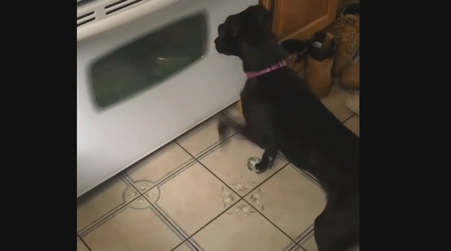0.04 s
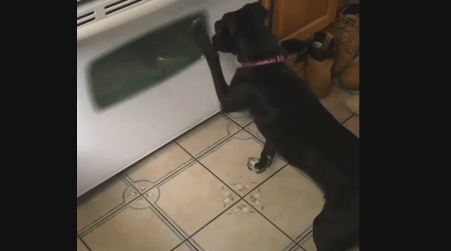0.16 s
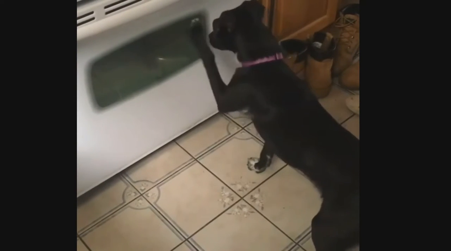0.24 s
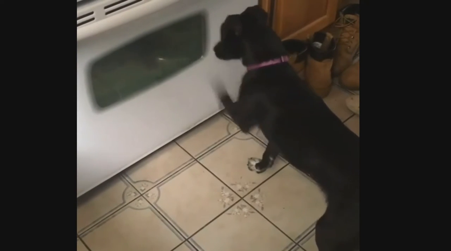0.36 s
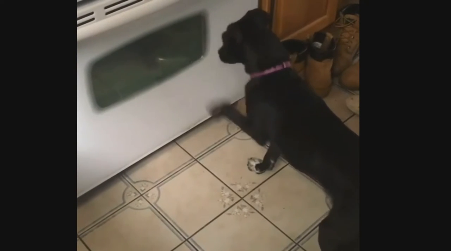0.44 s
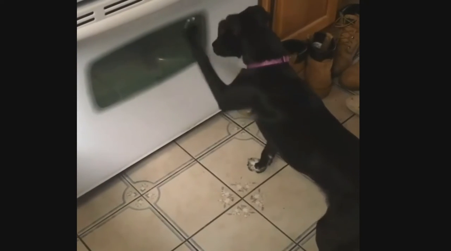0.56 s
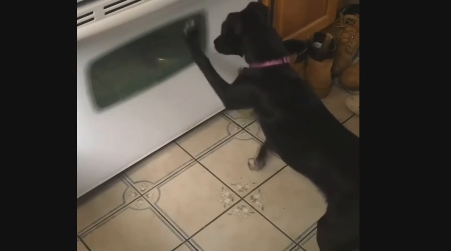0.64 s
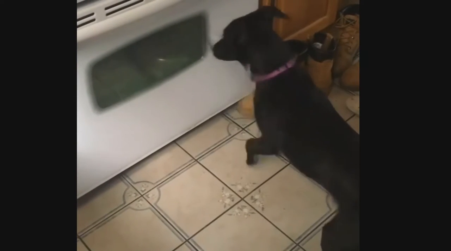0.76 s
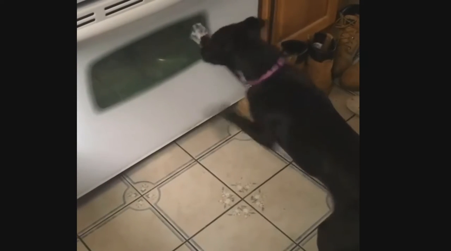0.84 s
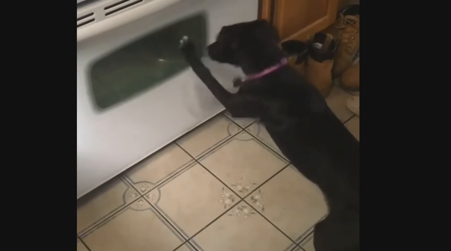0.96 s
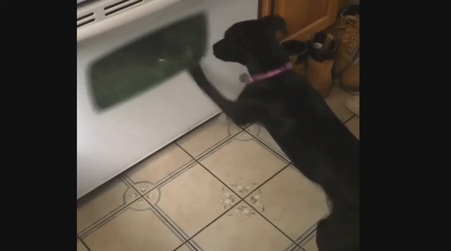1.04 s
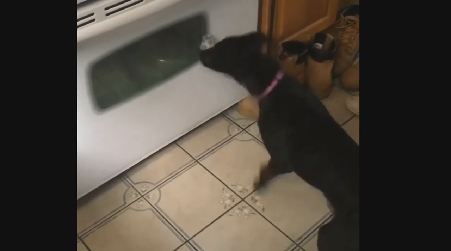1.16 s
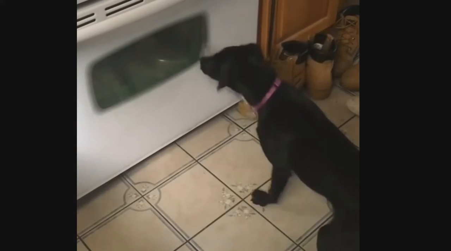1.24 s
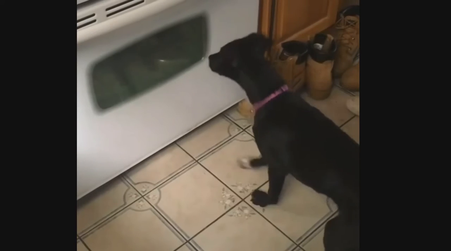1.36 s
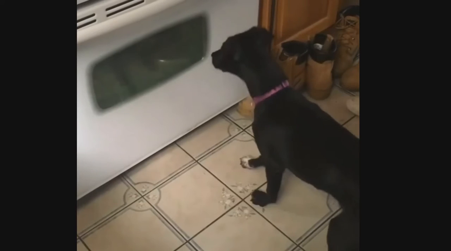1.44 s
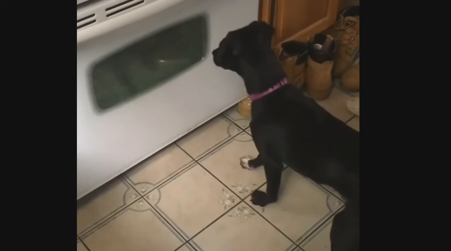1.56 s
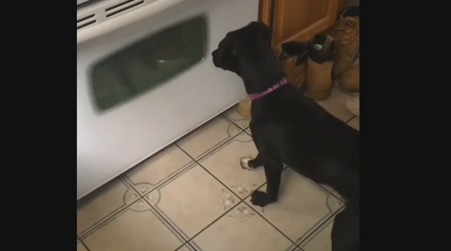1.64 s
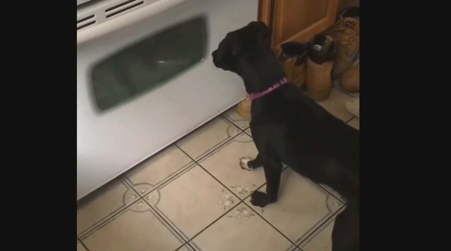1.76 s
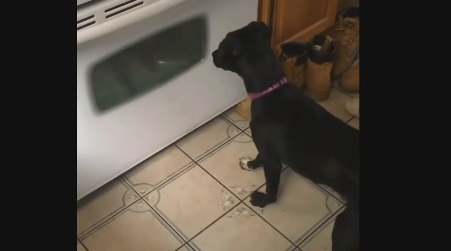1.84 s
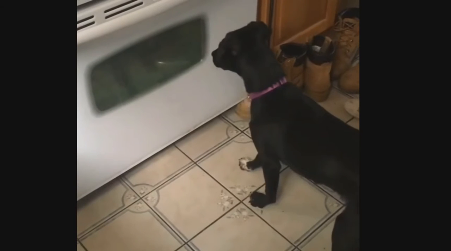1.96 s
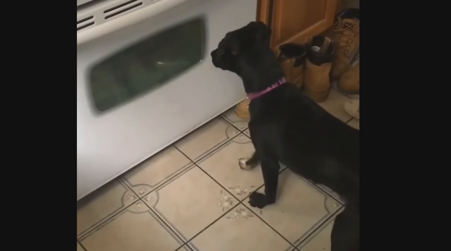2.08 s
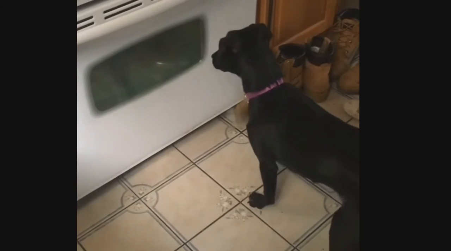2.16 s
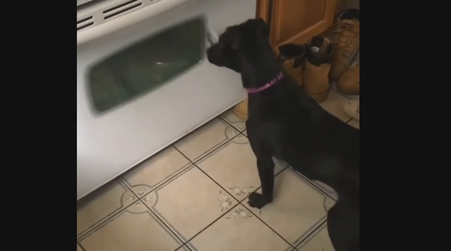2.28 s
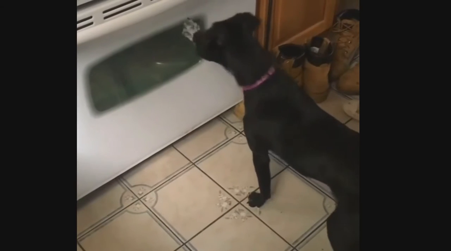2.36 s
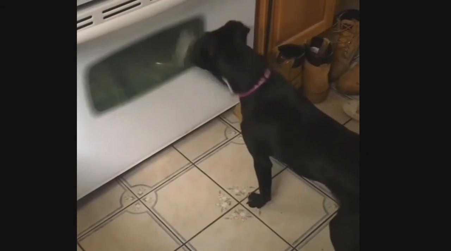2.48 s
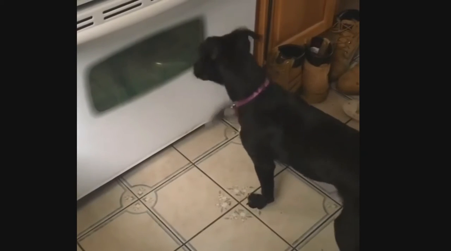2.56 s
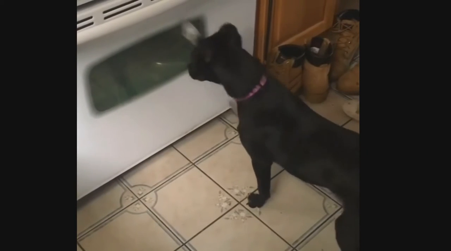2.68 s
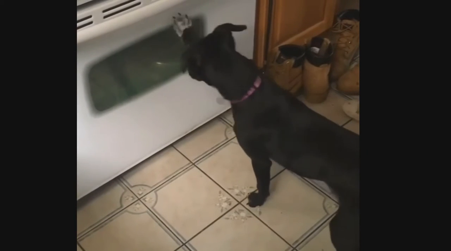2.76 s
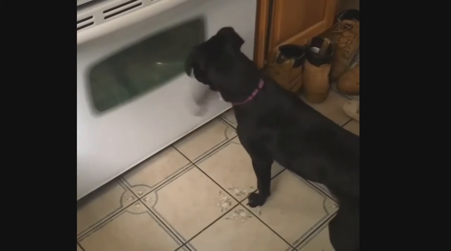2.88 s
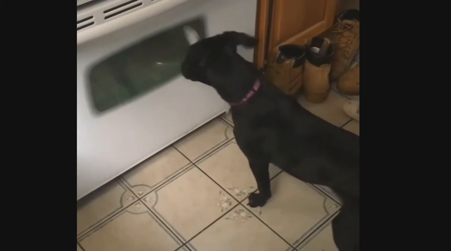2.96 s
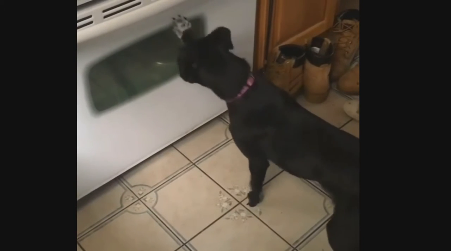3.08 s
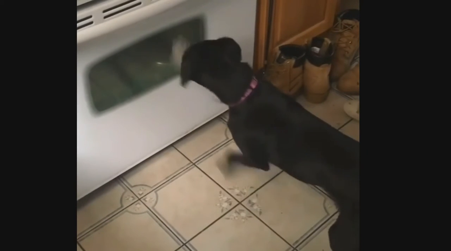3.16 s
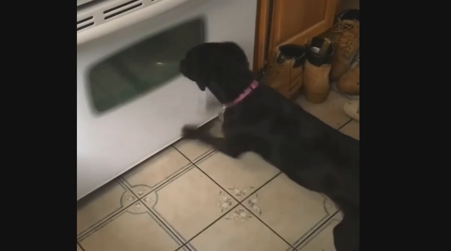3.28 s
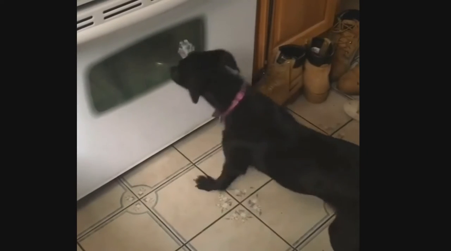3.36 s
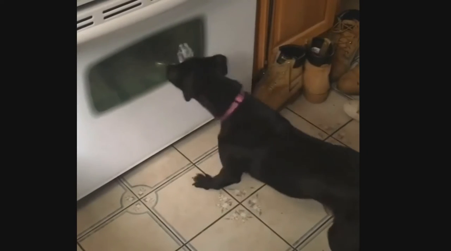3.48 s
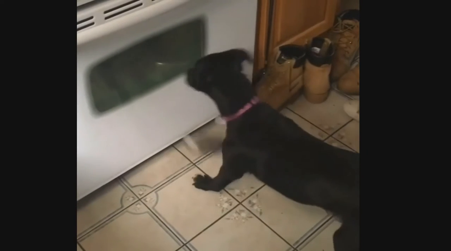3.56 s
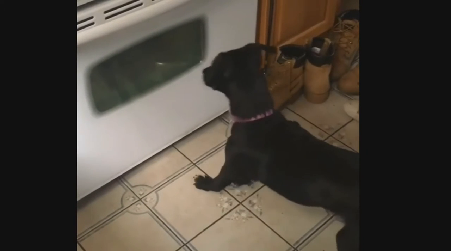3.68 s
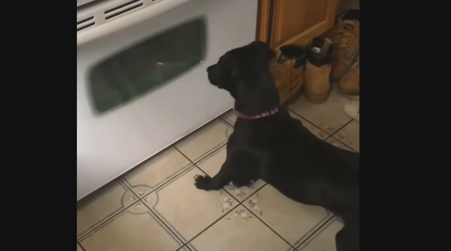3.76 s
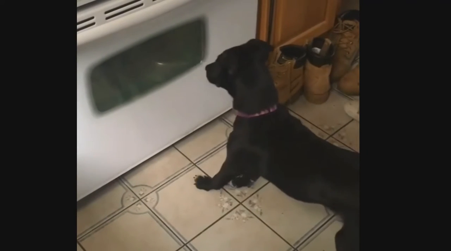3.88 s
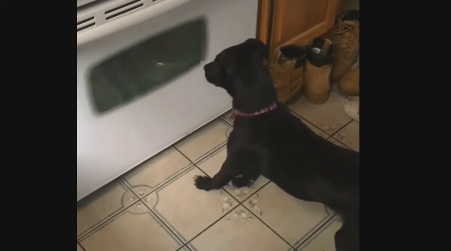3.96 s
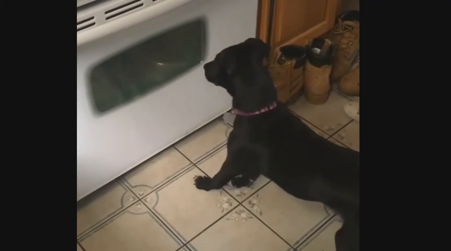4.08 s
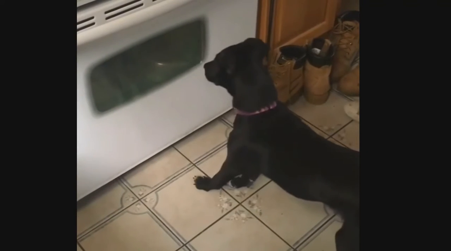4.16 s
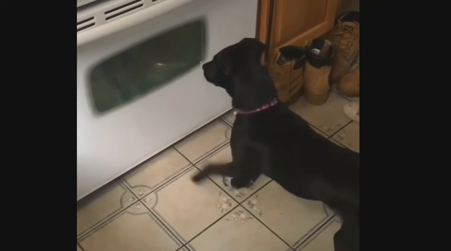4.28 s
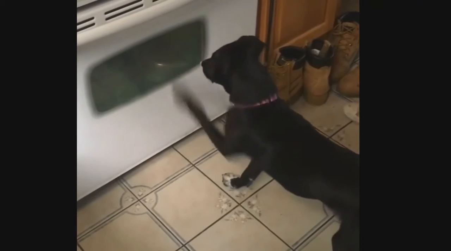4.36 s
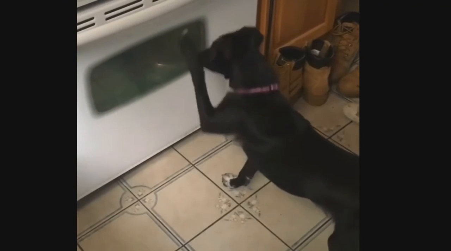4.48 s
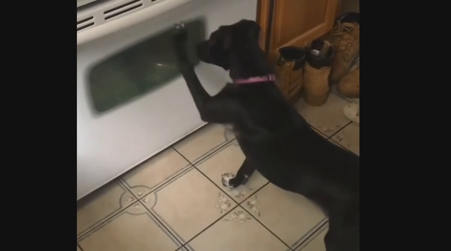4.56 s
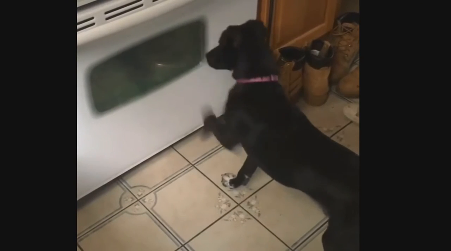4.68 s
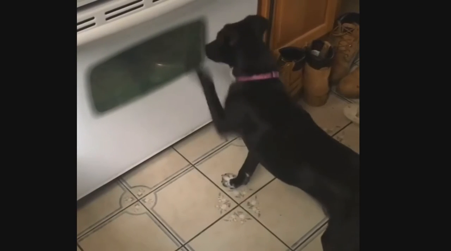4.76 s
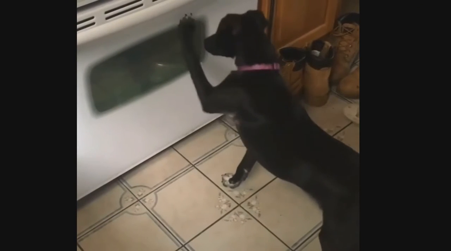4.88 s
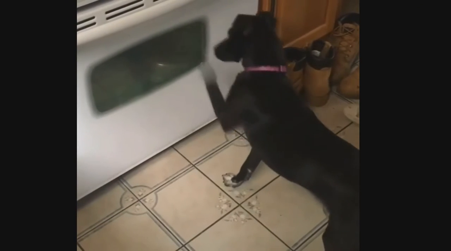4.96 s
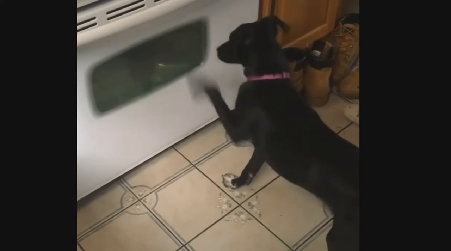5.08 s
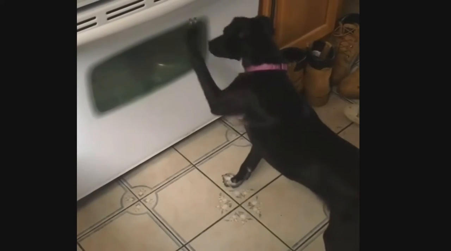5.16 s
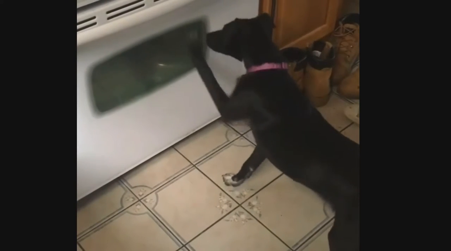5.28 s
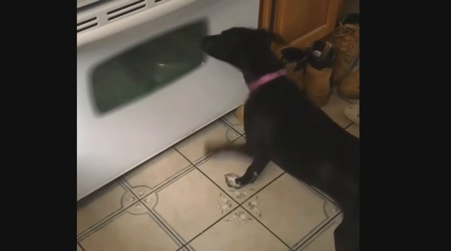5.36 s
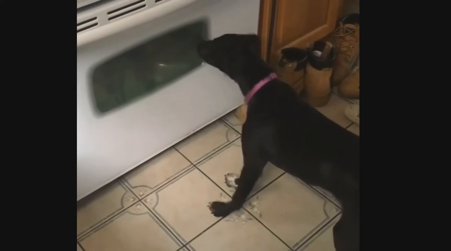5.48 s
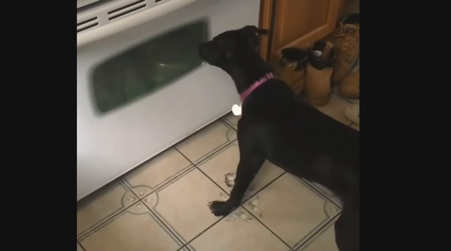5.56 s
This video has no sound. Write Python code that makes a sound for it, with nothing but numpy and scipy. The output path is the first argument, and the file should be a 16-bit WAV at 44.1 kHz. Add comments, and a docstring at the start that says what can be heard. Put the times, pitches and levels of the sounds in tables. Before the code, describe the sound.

A small kitchen heard close up, with a low steady appliance hum and faint hiss. In the first 0.15 seconds a puppy gives one tiny, low, closed-mouth whine, as a light claw swipe begins. Stronger swipes follow at about 0.5, 0.8, 0.9 and 1.1 seconds: crisp paired claw scratches ringing briefly in glass and trim, then padded thuds, rubbing drags and a faint low pad groan near 0.4. Thin, very high collar tags clink throughout, loudest around 1.0. Paws drop with a hollow floor knock at 1.3, tags settle, and it quietens. A second group runs from 2.3 to 3.3, with heavier door thumps near 3.0 and 3.3 and bright tag rattles, then a clawed landing on tile at 3.6. After a near-quiet pause, three more swipes come at 4.5, 4.8 and 5.1, small edge catches ticking between, ending with a clink and soft footfall near 5.4.

```python
"""A puppy paws at a glass oven door in a small kitchen, after one short low whine.
Its claws skid in bursts of tiny slips that excite the door's modes; its pads rub in jerks and groan.
Damped tones make the thuds on door and tiles, and decaying high modes the clinking collar tags.
An appliance hums under it all, and decaying echoes give the room."""
import sys
import numpy as np
from scipy import signal
from scipy.fft import rfft, irfft
from scipy.io import wavfile
from scipy.ndimage import uniform_filter1d

SR = 44100
rng = np.random.default_rng(int(sys.argv[2]) if len(sys.argv) > 2 else 0)


def bounce(signal):
    """Save signal as a 16-bit WAV file at the path given by the first command-line argument."""
    frames = np.transpose(np.atleast_2d(signal))
    limited = np.clip(frames, -1, 1)
    pcm = np.round(limited * 32767).astype(np.int16)
    wavfile.write(sys.argv[1], SR, pcm)


N = 247842

# Levels in all tables are relative. Spectra list relative density (frequency [Hz], density [dB per Hz]).
# mains hum harmonics: (frequency [Hz], level [dB])
HUM_HARMONICS = [(120, -44), (240, -73), (360, -88)]
# spectrum of low rumble and faint hiss: (frequency [Hz], density [dB per Hz])
AIR_SPECTRUM = [(20, -13), (38, 2), (52, 10), (75, -9), (150, 1), (220, -13.5), (400, -23), (700, -30),
                (1200, -30), (2500, -35.5), (5000, -40), (12000, -35)]
# the whine's course: (time [s], pitch [Hz], level [dB])
WHINE_COURSE = [(.015, 274.6, -85), (.045, 278, -44), (0.079, 302, -52), (.11, 312, -75), (.135, 295, -59)]
# spectrum of a skidding claw: (frequency [Hz], density [dB per Hz])
CLAW_SPECTRUM = [(150, -9), (500, -23), (1000, -14), (2000, -11), (3200, -6), (4500, -5), (5500, -3),
                 (7500, -6.5), (10500, -9), (13500, -9.5)]
# modes of the door's glass and trim: (frequency [Hz], level [dB], t60 [s])
DOOR_MODES = [(1000, -9, .2), (1340, -9, .2), (2250, -7, .2), (2569, -4, .25), (2840, -3, .25),
              (3169, 0, .25), (3276, -2, .25), (3548, -2, .25), (3818, 2, .25), (4573, 0, .25),
              (5310, 1, .22), (6195, -2, .22), (6328, -1, .22), (6877, -1, .22), (7539, -2, .2),
              (8532, -1, .2)]
# swipes, each two claw strikes, a pad thud and a drag down the door:
# (time [s], claw level [dB], gap to second claw [s], second skid [s], extra knock [dB], extra fizz [dB],
#  claw pitch [Hz], pad thud level [dB], drag length [s], drag level [dB])
PAW_SWIPES = [(0.1432, -23, .0165, 0.0044, -3, 2, 6300, -65, 0.18, -57),
              (0.5161, -14.5, 0.0052, 0.0061, -4.5, 3, 5420, -38, 0.16, -47),
              (0.7829, -14.5, 0.0036, 0.01, -3, 3, 6750, -44.5, 0.097, -51.5),
              (0.9035, -17, .006, .01, -4, 8, 6240, -56, .12, -48),
              (1.104, -15.5, .005, 0.013, .5, 2.5, 6700, -39, 0.13, -53.5),
              (2.3146, -24, .0045, 0.0144, -5.5, -0.5, 6260, -63, 0.15, -53.5),
              (2.6565, -20, 0.0074, 0.0042, -6.5, 1.5, 5800, -35, 0.16, -52),
              (2.969, -15.5, 0.0058, .004, -3.5, 0.5, 5600, -31.5, 0.17, -55),
              (3.314, -15.5, .007, 0.0056, 1, 2.5, 4950, -29, 0.16, -56),
              (4.483, -18.5, 0.005, 0.02, 0, 4.5, 6170, -59, .12, -47.5),
              (4.794, -14.5, 0.0062, 0.0034, -8.5, 2.5, 5300, -35.5, 0.17, -48.5),
              (5.1129, -15, 0.0048, 0.0056, -4, 3, 6100, -32, 0.19, -48.5)]
# on the way down a claw catches the door's edge:
# (time [s], skid [s], level [dB], extra knock [dB], extra fizz [dB], claw pitch [Hz])
EDGE_CATCHES = [(0.329, 0.015, -40, -0.5, -15, 3300), (0.689, 0.009, -35, 10, -5.5, 3860),
                (3.177, .006, -36, -2, 8, 7500), (4.955, 0.0088, -38.5, 11, -7, 4000),
                (4.992, 0.0064, -37, 9, 13, 2800), (5.285, 0.0089, -34, 11, -4, 3850)]
# paws come down on the tiles and slide a little:
# (time [s], claw level [dB], extra fizz [dB], weight level [dB], thud pitch [Hz], slide level [dB])
LANDINGS = [(1.305, -51, -6, -13, 161, -90), (2.185, -65.5, -9, -61, 230, -82.5),
            (3.61, -33, 7.5, -20.5, 223, -64.5), (4.135, -54, 21.5, -56.5, 229, -89.5),
            (5.433, -45, 1, -36.5, 226, -81.5)]
# spectrum of the hollow door when bumped: (frequency [Hz], density [dB per Hz])
HOLLOW_SPECTRUM = [(250, -8.5), (450, -3), (700, -0.5), (930, 0.5), (1400, 1.5), (2200, -8.5), (3500, -4),
                   (7000, -21)]
# spectrum of a pad's slap: (frequency [Hz], density [dB per Hz])
SLAP_SPECTRUM = [(60, -25), (150, 7), (240, 1.5), (320, -4.5), (410, -6), (510, -18), (700, -11),
                 (950, -24), (1400, -24), (1800, -22), (2250, -20.5), (5000, -58)]
# spectrum of rubbing pads: (frequency [Hz], density [dB per Hz])
RUB_SPECTRUM = [(200, -8.5), (500, -4), (1000, 1.5), (2000, -4), (4000, 1.5), (7000, -3), (13000, -7)]
# spectrum of the grumbling sheet metal: (frequency [Hz], density [dB per Hz])
PANEL_SPECTRUM = [(20, -52.5), (45, 9), (80, 12), (160, -5), (250, 3), (330, -2), (450, -17), (900, -26.5),
                  (3000, -47.5)]
# pads stick and slip on the glass, one list per groan: (time [s], pitch [Hz], level [dB])
GROAN_COURSES = [
    [(.23, 230, -61), (.26, 243, -47), (.3, 272, -68)],
    [(.35, 185, -52), (.395, 161, -40.5), (.425, 142, -46), (.465, 136, -54)],
    [(4.825, 277.9, -54), (4.86, 264.7, -48.5), (4.94, 260, -63)],
]
# hard clinks of the collar tags:
# (time [s], level [dB], extra dry tick [dB], large tag against small [dB])
TAG_CLINKS = [(0.4574, -43, -13, -2), (0.7562, -31.5, -18, -10), (0.8799, -29.5, -4.5, -5),
              (1.0345, -20, -13.5, -24), (1.055, -23, -2, -14), (1.1744, -24, -19.5, -14),
              (1.2875, -33, 3, -15), (1.3488, -41.5, 13.5, -10), (1.4541, -30, 0.5, -9),
              (1.5618, -39, -0.5, -12), (1.6945, -53.5, 6.5, -9), (2.5551, -30, 0.5, -23),
              (2.7836, -38.5, 1.5, -3), (2.9003, -40.5, 5, -15.5), (2.9542, -29, -5.5, -21),
              (3.0914, -21.5, -11.5, -13.5), (3.2575, -17, -2.5, -25), (3.2894, -26, 7.5, -8.5),
              (3.4246, -20.5, 7.5, -12), (3.5324, -26, -3.5, -14.5), (4.0951, -37, 0.5, -33.5),
              (4.7027, -28, -4, -4), (5.0444, -25.5, -17, -3), (5.0883, -20.5, 3.5, -19),
              (5.4131, -27, 0.5, -16)]
# modes of the two tags, damped by fur: (frequency [Hz], level [dB], t60 [s])
SMALL_TAG_MODES = [(7041, -15, .16), (8473, -13, .16), (9800, -12, .08), (11090, -9, .08), (11880, -1, .17),
                   (11950, 0, .17), (12020, -1, .14), (12135, -5, .12), (13200, -8, .07)]
LARGE_TAG_MODES = [(7666, 0, .5), (10470, -5, .2), (11930, -1, .3)]
# modes of the sprung floor: (frequency [Hz], level [dB], t60 [s])
FLOOR_MODES = [(160, -2, .1), (235, -1, .09), (300, 0, .09), (360, -4, .08), (690, -18, .07),
               (1450, -22, .08), (1640, -19, .11), (1780, -16, .1), (1950, -21, .08)]
# decay of the room's echoes: (frequency [Hz], t60 [s])
KITCHEN_DECAY = [(100, 0.63), (400, 0.37), (1500, 0.32), (4000, 0.26), (8000, 0.21), (14000, 0.22)]

AIR_DB = -52
# the leading claw has a fixed skid; the second claw is lighter the longer it skids
FIRST_SKID_S, FIRST_CLAW_DB, SKID_FADE_DB_PER_S = 0.0042, -1, 150.5
STEP_SKID_S, STEP_KNOCK_DB, STEP_HZ = 0.0056, 8, 9600
# the hollow door answers a square, knocking strike most (dB of bump per dB of knock)
BUMP_DB, BUMP_PER_KNOCK = -20.5, 2.6
# the pad follows the claws, with weight behind it; its bump and push are against its thud
PAD_LAG_S, PAD_HZ, PAD_PUSH_DB, PAD_BUMP_DB = .062, 239.5, 1, -7.5
# let go, the door springs back: lags after the slip-off, and levels against the drag
REBOUND_LAG_S, REBOUND_PUSH_LAG_S = .026, .045
REBOUND_BUMP_DB, REBOUND_THUD_DB, REBOUND_PUSH_DB = 10.5, 5.5, 16.5
DRAG_RISE_S, DRAG_RELEASE_S, SLIDE_S, RUB_DB, FLEX_DB = 0.14, .1, 0.18, 3, 4.5
# every swipe also sets the tags swinging into faint clinks
SWING_FROM_S, SWING_TO_S = .1, .36
SWING_DB, SWING_SPREAD_DB, SWING_TICK_DB, SWING_LARGE_DB = -44.5, 5.5, 0, -14.5
# the tags hang differently at every blow, which shifts their pitch by up to this fraction
RATTLE_S, TAG_DETUNE = .0045, 0.0019
# claws touch first, then the floor knocks, the pad thuds and the weight settles
KNOCK_LAG_S, HEEL_LAG_S, SETTLE_LAG_S, HEEL_DB, SETTLE_DB = 0.00323, .016, 0.0343, -6, -12
EDGE_HZ = 14050


def amp(db):
    """Converts decibels to a linear gain."""
    return 10 ** (np.asarray(db) / 20)


def evened(x):
    """Normalizes power: scales to rms 1."""
    return x / np.sqrt(np.mean(x ** 2) + 1e-20)


def read(points, hz):
    """Interpolates linearly along a logarithmic frequency axis."""
    f, value = np.transpose(points)
    return np.interp(np.log(hz + 1), np.log(f + 1), value)


def add(mix, s, sound):
    """Superposes a sound on the mix at time s."""
    part = mix[max(round(s * SR), 0):][:len(sound)]
    part += sound[:len(part)]


def coloured(x, *spectra):
    """Linear filtering in the frequency domain: the dB spectra of cascaded filters sum."""
    hz = np.fft.rfftfreq(len(x), 1 / SR)
    gain_db = sum(read(points, hz) for points in spectra)
    return irfft(rfft(x) * amp(gain_db), len(x))


def background():
    """Periodic mains hum of an appliance plus broadband noise for its low rumble and faint hiss."""
    t = np.arange(N) / SR
    hum = np.zeros(N)
    for hz, db in HUM_HARMONICS:
        hum += amp(db) * np.sqrt(2) * np.sin(2 * np.pi * (hz * t + rng.random()))
    air = evened(coloured(rng.standard_normal(N), AIR_SPECTRUM))
    return hum + amp(AIR_DB) * air


def glide(rows, overtones_db, roughness):
    """Frequency modulation: a wavering harmonic tone follows rows of (time [s], pitch [Hz], level [dB])."""
    s, hz, db = np.transpose(rows)
    t = np.arange(N) / SR
    waver = evened(uniform_filter1d(rng.standard_normal(N), size=200))
    pitch = np.interp(t, s, hz) * (1 + roughness * waver)
    turns = np.cumsum(pitch) / SR
    tone = sum(amp(level) * np.sin(2 * np.pi * (k + 1) * turns) for k, level in enumerate(overtones_db))
    return evened(tone) * amp(np.interp(t, s, db, left=-120, right=-120))


def whine():
    """Voiced harmonics in a soft closed-mouth whine that rises, then dips at its end."""
    return glide(WHINE_COURSE, overtones_db=[3.0, -15.0, -18.5, -28], roughness=.05)


def slips(size, spread_db):
    """Stick-slip friction as noise: dense tiny slips of uneven strength."""
    unevenness = np.minimum(rng.exponential(1, size), 4)
    return evened(rng.standard_normal(size) * amp(spread_db * unevenness))


def contact(length, rise, release, size=4096):
    """Contact force: an exponential bite, a hold while skidding, and an exponential release."""
    t = np.arange(size) / SR
    return (1 - np.exp(-t / rise)) * np.exp(-np.maximum(t - length, 0) / release)


def ring(modes, scatter_db, size=24576, detune=0):
    """Modal decay with energy 1; every blow lands elsewhere and favours other modes."""
    t = np.arange(size) / SR
    hz, db, t60 = np.transpose(modes)[:, :, None]
    db = db + scatter_db * rng.uniform(-1, 1, hz.shape)
    hz = hz * (1 + detune * rng.uniform(-1, 1, hz.shape))
    partials = amp(db - 60 * t / t60) * np.sin(2 * np.pi * (hz * t + rng.random(hz.shape)))
    out = np.sum(partials, axis=0)
    onset = np.minimum(np.arange(size) / 44, 1)  # about 1 ms
    return out * onset / np.linalg.norm(out)


def claw(length, db, knock_db, fizz_db, hz):
    """Dry friction: a claw skids for milliseconds in a burst of slips, peaked at its own pitch."""
    force = contact(length, rise=.0006, release=.0016)
    tint = [(1500, knock_db), (3300, 0.0031), (5000, 0.0026), (9500, fizz_db)]
    squeak = [(hz / 1.25, 0), (hz, 3), (hz * 1.25, 0)]
    grain = coloured(slips(len(force), spread_db=3.5), CLAW_SPECTRUM, tint, squeak)
    return amp(db) * force * evened(grain)


def scratches():
    """Friction exciting resonance: claws set the door ringing briefly, while the tiles stay dead."""
    out, skids = np.zeros(N), []
    for s, db, gap, length, knock_db, fizz_db, hz, *_ in PAW_SWIPES:
        skids.append((s, claw(FIRST_SKID_S, db + FIRST_CLAW_DB, knock_db, fizz_db, hz)))
        second_db = db - SKID_FADE_DB_PER_S * length
        skids.append((s + gap, claw(length, second_db, knock_db, fizz_db, hz)))
    for s, length, db, knock_db, fizz_db, hz in EDGE_CATCHES:
        skids.append((s, claw(length, db, knock_db, fizz_db, hz)))
    for s, skid in skids:
        add(out, s, amp(1.5) * skid)
        door = ring(DOOR_MODES, scatter_db=5.5, size=8192)
        add(out, s, amp(-15.5) * np.linalg.norm(skid) * door)
    for s, db, fizz_db, *_ in LANDINGS:
        add(out, s, amp(7.5) * claw(STEP_SKID_S, db, STEP_KNOCK_DB, fizz_db, STEP_HZ))
    return out


def bump(db, length):
    """Forced response of a cavity: a paw bumps and scuffs the hollow door."""
    force = contact(length, rise=.002, release=0.024)
    scuff = evened(coloured(slips(len(force), spread_db=4.5), HOLLOW_SPECTRUM))
    return amp(db - 10.0) * force * scuff


def thud(db, hz, t60, slap_db):
    """Cushioned impact: a padded blow gives a damped tone with a noisy slap."""
    t = np.arange(SR // 4) / SR
    cushion = 1 - np.exp(-t / .003)
    tone = amp(-60 * t / t60) * np.sin(2 * np.pi * hz * t)
    slap_force = contact(0.0036, rise=0.00081, release=0.024, size=len(t))
    slap = slap_force * evened(coloured(rng.standard_normal(len(t)), SLAP_SPECTRUM))
    return amp(db + 0.5) * cushion * (tone + amp(slap_db) * slap)


def push(db, hz=55):
    """Low-frequency pressure pulse: one slow push of the puppy's weight under a Gaussian swell."""
    t = np.arange(SR // 12) / SR - .025  # the swell peaks 25 ms in
    swell = np.exp(-(t / .011) ** 2)
    return amp(db - 4) * swell * np.cos(2 * np.pi * hz * t)


def paws():
    """Impact and elastic recoil: the door bumps, the pad thuds, and the door springs back at slip-off."""
    out = np.zeros(N)
    for s, db, _, _, knock_db, _, _, pad_db, drag, drag_db in PAW_SWIPES:
        add(out, s, bump(db + BUMP_DB + BUMP_PER_KNOCK * knock_db, length=0.054))
        pad_s = s + PAD_LAG_S
        add(out, pad_s, thud(pad_db, hz=PAD_HZ, t60=0.079, slap_db=-9))
        add(out, pad_s, bump(pad_db + PAD_BUMP_DB, length=.007))
        add(out, pad_s, push(pad_db + PAD_PUSH_DB))
        let_go = s + drag
        add(out, let_go + REBOUND_LAG_S, bump(drag_db + REBOUND_BUMP_DB, length=0.026))
        add(out, let_go + REBOUND_LAG_S, thud(drag_db + REBOUND_THUD_DB, hz=260, t60=0.14, slap_db=2))
        # the weight shifts after the paw lets go
        add(out, let_go + REBOUND_PUSH_LAG_S, push(drag_db + REBOUND_PUSH_DB))
    return out


def rubbing():
    """Jerky sliding friction: pads drag down the door, whose sheet metal grumbles, and slide on tiles."""
    on_door, on_tiles = np.zeros((2, N))
    for s, *_, length, db in PAW_SWIPES:
        add(on_door, s, amp(db) * contact(length, rise=DRAG_RISE_S, release=DRAG_RELEASE_S, size=SR))
    for s, *_, db in LANDINGS:
        add(on_tiles, s, amp(db) * contact(SLIDE_S, rise=0.025, release=0.049, size=SR))
    unevenness = evened(coloured(rng.standard_normal(N), [(40, 62), (100, -67), (300, -91)]))
    jerks = amp(3.3 * unevenness)
    grain = evened(coloured(jerks * slips(N, spread_db=7), RUB_SPECTRUM))
    grumble = evened(jerks * coloured(rng.standard_normal(N), PANEL_SPECTRUM))
    return (on_door + on_tiles) * amp(RUB_DB) * grain + on_door * amp(FLEX_DB) * grumble


def groans():
    """Periodic stick-slip: damp pads judder down the glass with a low groan."""
    return sum(glide(rows, overtones_db=[0, -17, -26], roughness=0.03) for rows in GROAN_COURSES)


def swings(count=2):
    """Pendulum-like swing: faint clinks at random moments after each swipe, in rows like TAG_CLINKS."""
    rows = []
    for s, *_ in PAW_SWIPES:
        for when, force in rng.random((count, 2)):
            clink_s = s + SWING_FROM_S + when * (SWING_TO_S - SWING_FROM_S)
            clink_db = SWING_DB + SWING_SPREAD_DB * (2 * force - 1)
            rows.append((clink_s, clink_db, SWING_TICK_DB, SWING_LARGE_DB))
    return rows


def collar():
    """Repeated impact of two resonators: metal tags strike, ring, and chatter on for a moment."""
    ticks, rings = np.zeros((2, N))
    force = contact(RATTLE_S, rise=0.00031, release=0.0032)
    for s, db, tick_db, large_db in list(TAG_CLINKS) + swings():
        add(ticks, s, amp(db + tick_db) * force * slips(len(force), spread_db=-4.0))
        strength = amp(db - 9) * np.linalg.norm(force)
        large = ring(LARGE_TAG_MODES, scatter_db=3, size=16384)
        add(rings, s, strength * amp(large_db) * large)
        small = ring(SMALL_TAG_MODES, scatter_db=15.0, size=8192, detune=TAG_DETUNE)
        add(rings, s, strength * small)
        for delay in np.cumsum(rng.uniform(0.0054, 0.0062, size=4)):  # ever weaker rebounds
            fade = amp(-12 - 150 * delay)
            small = ring(SMALL_TAG_MODES, scatter_db=14.0, size=8192, detune=TAG_DETUNE)
            add(rings, s + delay, fade * strength * small)
            add(ticks, s + delay, fade * amp(db + 4.5) * force * slips(len(force), spread_db=5.5))
    tick_spectrum = [(1000, -30.5), (5000, -21), (7500, -11.5), (10000, -5.5), (12000, 3.0), (14000, -12.0)]
    return rings + coloured(ticks, tick_spectrum)


def footfalls():
    """Modal impact: forepaws drop on the floor, which knocks hollowly and gives under the weight."""
    out, t = np.zeros(N), np.arange(SR // 4) / SR
    modes = sum(amp(db - 60 * t / t60) * np.sin(2 * np.pi * hz * t) for hz, db, t60 in FLOOR_MODES)
    cushion = 1 - np.exp(-t / .003)
    for s, _, _, db, hz, _ in LANDINGS:
        add(out, s + KNOCK_LAG_S, amp(db - 8.5) * cushion * modes)
        add(out, s + HEEL_LAG_S, thud(db + HEEL_DB, hz=hz, t60=0.079, slap_db=-13))
        add(out, s + SETTLE_LAG_S, push(db + SETTLE_DB))
    return out


def reflections(size):
    """Frequency-dependent absorption: dense echoes off tiles and cabinets die band by band; energy 1."""
    taps = rng.choice([-1., 1.], size) * (rng.random(size) < 6000 / SR)  # about 6000 echoes per second
    hz, t, z = signal.stft(taps, SR, nperseg=256)
    decay = amp(-60 * t / read(KITCHEN_DECAY, hz)[:, None])
    tail = signal.istft(z * decay, SR, nperseg=256)[1][:size]
    tail = tail * np.clip(np.arange(size) / SR / .003 - .5, 0, 1)  # silent at first, full by 4.5 ms
    return tail / np.linalg.norm(tail)


def kitchen(x, count=3):
    """Reverberation from a moving source: the puppy keeps shifting, so the echo pattern drifts."""
    turn = np.arange(N) / SR / 1.3
    shares = np.sqrt(2 / count) * np.cos(np.pi * (turn + np.arange(count)[:, None] / count))
    return sum(signal.oaconvolve(x * share, reflections(size=24576))[:N] for share in shares)


def scene():
    """Superposition of direct sound, reverberation and the steady background."""
    bright = scratches() + collar()
    soft = paws() + footfalls() + rubbing() + groans() + whine()
    direct = bright + amp(1.5) * soft
    echoes = amp(-4) * kitchen(bright + amp(-4.0) * soft)
    return (direct + echoes + background())[None]


def record(dry):
    """Soft saturation rounds off the sharpest peaks; a low-pass filter then limits the band."""
    ceiling = .7
    rounded = ceiling * np.tanh(dry / ceiling)
    lowpass = signal.firwin(401, EDGE_HZ, window=("kaiser", 7), fs=SR)
    return signal.oaconvolve(rounded, lowpass[None], "same")


dry = scene()
out = record(dry)
bounce(out)
```